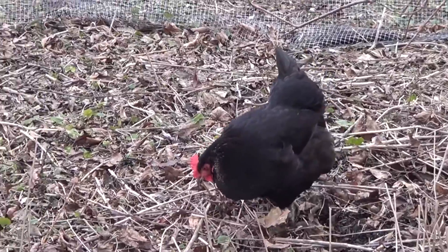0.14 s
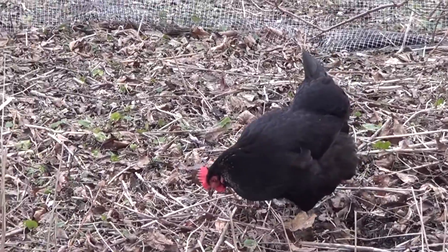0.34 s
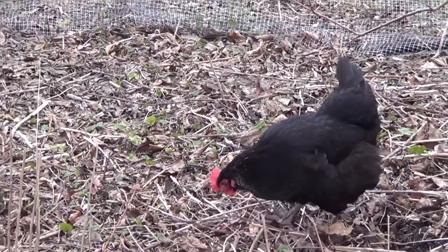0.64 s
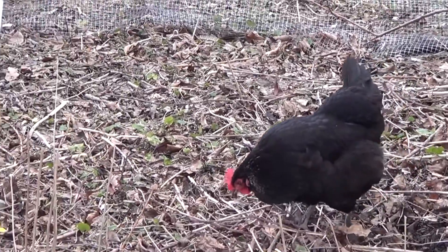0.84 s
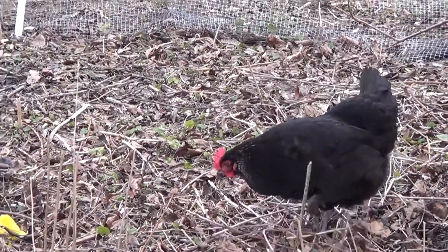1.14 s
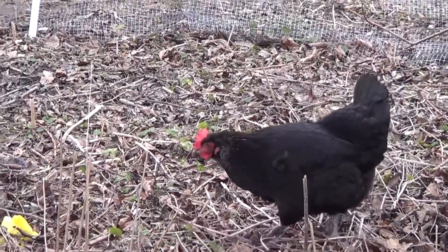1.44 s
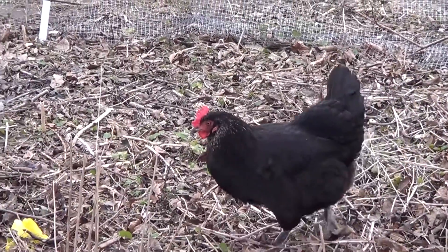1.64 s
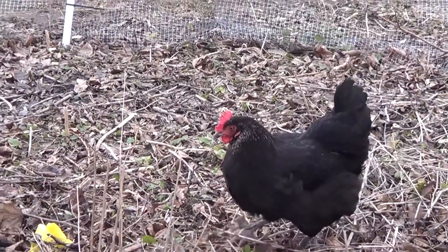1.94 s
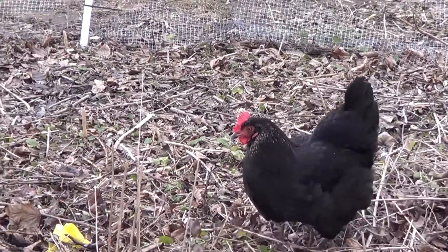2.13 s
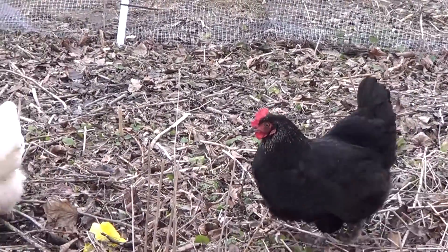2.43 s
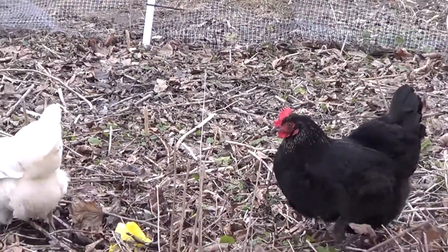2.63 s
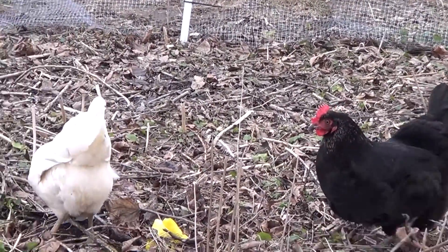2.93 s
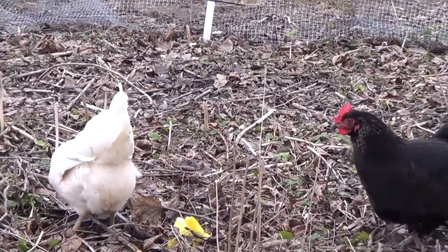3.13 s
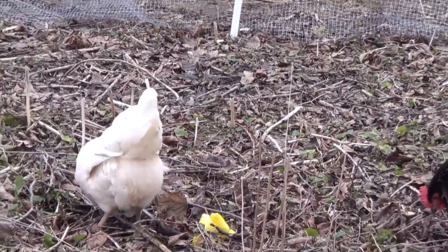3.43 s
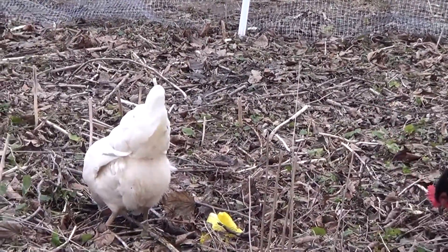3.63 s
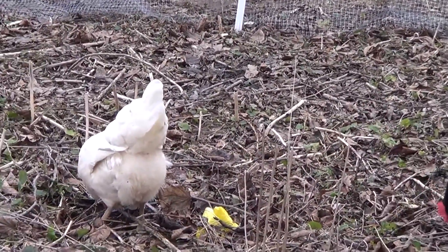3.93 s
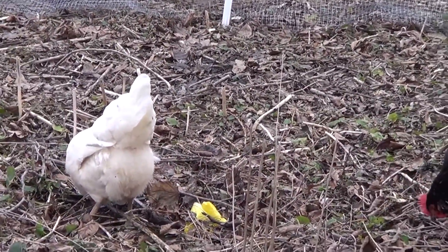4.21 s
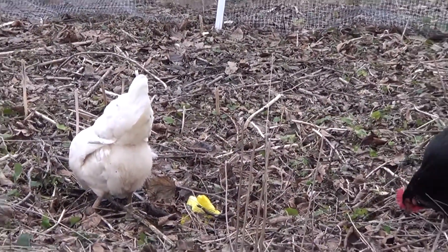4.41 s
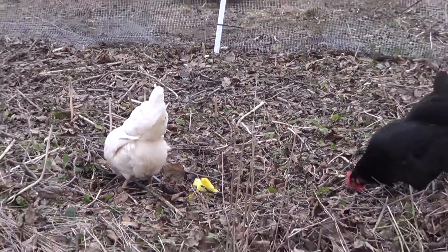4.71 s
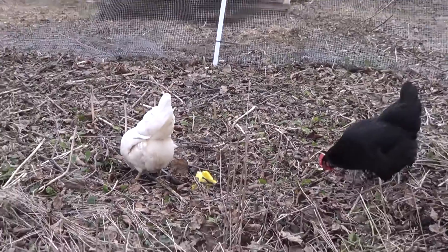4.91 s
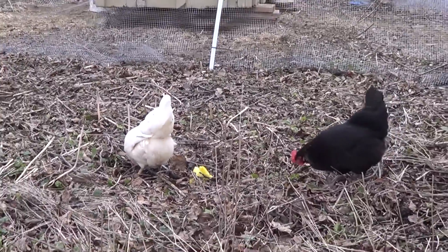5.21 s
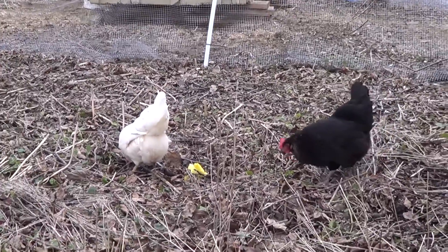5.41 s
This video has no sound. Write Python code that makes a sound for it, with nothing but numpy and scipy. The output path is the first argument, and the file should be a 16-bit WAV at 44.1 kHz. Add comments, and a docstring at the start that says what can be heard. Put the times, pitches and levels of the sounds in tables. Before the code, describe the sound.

A steady buzzing motor hum lies under bright, crisp leaf rustling. Foot scratches come in irregular swishes with dry twig snaps, densest in the middle, followed by a short lull and quieter picking. Brief hoarse bird cheeps and faint zigzag twitters appear. The handheld-style stereo microphone is a few steps away outdoors, with soft background noise and little echo.

```python
"""An outdoor run, where hens scratch and peck through dry leaves and straw while small birds chirp.
The litter is made of thousands of tiny noise bursts, with snaps and knocked stalks added one by one.
The birds are gliding whistles with a trill and a few echoes.
Behind them a motor drones as a comb of sine overtones over soft filtered noise, and a thin high tone whines."""
import sys
import numpy as np
from scipy import signal
from scipy.fft import rfft, irfft
from scipy.io import wavfile
from scipy.ndimage import uniform_filter1d

SR = 44100
rng = np.random.default_rng(int(sys.argv[2]) if len(sys.argv) > 2 else 0)


def materialize(psi):
    """Save the field psi as 16-bit PCM at rate SR to the path in sys.argv[1].

    A 1-D psi becomes a single channel; in a 2-D psi each row is a channel.
    """
    bounded = np.clip(np.atleast_2d(psi).T, -1, 1)
    quanta = np.round(bounded * 32767).astype(np.int16)
    wavfile.write(sys.argv[1], SR, quanta)


N = 245195


def amp(db):
    """Turn a level in dB into a plain multiplier."""
    return 10 ** (np.asarray(db) / 20)


def rms_one(x):
    """Scale a signal to an average strength (rms) of 1."""
    return x / np.sqrt(np.mean(x ** 2) + 1e-20)


def in_time(rows):
    """Draw straight lines between table rows, giving one value per sample for each column."""
    s, *columns = np.transpose(rows)
    return [np.interp(np.arange(N) / SR, s, column) for column in columns]


def at_hz(points, hz):
    """Read a (f/Hz, dB) table at any frequency, on a logarithmic pitch axis."""
    table_hz, table_db = np.array(points).T
    return np.interp(np.log(np.maximum(hz, 1)), np.log(table_hz), table_db)


def colour(x, spectrum):
    """Shape a sound's spectrum with a minimum-phase filter, which answers as promptly as it can."""
    wanted_db = at_hz(spectrum, np.fft.rfftfreq(4096, 1 / SR))
    cepstrum = irfft(np.log(amp(wanted_db)))
    # folding the cepstrum onto its first half makes the filter minimum-phase
    cepstrum[1:2048] *= 2
    cepstrum[2049:] = 0
    response = irfft(np.exp(rfft(cepstrum)))
    return signal.oaconvolve(x, response)[:N]


def drift(rate):
    """Random wandering around 0 with spread 1: noise smoothed twice at `rate` Hz."""
    r = np.exp(-80 * np.pi * rate / SR)   # computed at every 40th sample
    noise = rng.standard_normal(N // 40 + 2002)
    slow = signal.lfilter([1], [1, -2 * r, r * r], noise)[2000:]   # skip the filter's start
    return np.interp(np.arange(N) / 40, np.arange(len(slow)), rms_one(slow - slow.mean()))


def butter(x, hz, kind, order=2):
    """Keep the low, high or middle band of a sound with a Butterworth filter."""
    return signal.sosfilt(signal.butter(order, hz, kind, fs=SR, output="sos"), x)


FLOOR_DB, FLOOR_SWELL_DB = -43.5, 0.3   # middle level and its slow wander
# colour of the background noise: (f/Hz, relative level/dB per Hz)
FLOOR_COLOUR = [(20, -43), (70, -19.5), (200, -16), (370, -17.5), (800, -14), (1200, -21.5), (2200, -18.5),
                (2900, -26), (6000, -31.5), (9500, -48), (14000, -48), (16000, -47)]
# left-right difference compared with the shared middle: (f/Hz, level/dB)
FLOOR_WIDTH = [(30, -48), (125, -28), (400, -12.5), (1000, -9), (2000, -7), (5000, 0.5), (8000, 7),
               (10000, -31)]


def floor():
    """Outdoor air and motor noise: a shared part, plus a part added left and subtracted right."""
    mid, side = [colour(white, FLOOR_COLOUR) for white in rng.standard_normal((2, N))]
    scale = amp(FLOOR_DB + FLOOR_SWELL_DB * drift(1)) / mid.std()
    return scale * (mid + colour(side, FLOOR_WIDTH) * [[1], [-1]])


WHINE_HZ, WHINE_DB, WHINE_WIDTH_HZ = 15734, -58, 4   # the width is the spread of the pitch wander


def whine():
    """A thin high tone: one sine whose pitch wanders slightly."""
    cycles = np.cumsum(WHINE_HZ + WHINE_WIDTH_HZ * drift(30)) / SR
    return np.sqrt(2) * amp(WHINE_DB) * np.sin(2 * np.pi * cycles)


FIRST_OVERTONE, LAST_OVERTONE = 4, 55
WEAK_OVERTONE_DB, WEAK_SPREAD_DB = -66, 0.5   # every multiple not listed below
# overtones that stand out: (multiple of the turning rate, middle level/dB)
STRONG_OVERTONES = [(7, -56.5), (10, -50.5), (14, -64), (16, -63.5), (17, -53.5), (19, -58), (28, -59),
                    (30, -55), (31, -55), (32, -56), (33, -58.5), (42, -61), (47, -62), (48, -58),
                    (49, -66), (51, -63.5)]


def overtone_levels():
    """Middle level in dB of each overtone: a few stand out of a weak, uneven comb."""
    multiples = range(FIRST_OVERTONE, LAST_OVERTONE + 1)
    weak_db = WEAK_OVERTONE_DB + WEAK_SPREAD_DB * rng.standard_normal(len(multiples))
    strong_db = {round(k): db for k, db in STRONG_OVERTONES}
    return dict(zip(multiples, weak_db)) | strong_db


TURNS_PER_S, TURNS_WANDER = 30.65, 0.035   # turning rate and its wander, both in Hz
WAVER_DB, WAVER_RATE = 2.5, 4.3   # wavering of an overtone: spread in dB, speed in Hz
MOTOR_LEAD_S = 0.000083   # the drone reaches the left port first
# the two strongest overtones swell and fade: (t/s, 18th overtone level/dB, 24th overtone level/dB)
MOTOR_SWELLS = [(0.05, -40, -50), (1.24, -40.5, -46.5), (1.4, -42, -56), (2.17, -38.5, -47),
                (2.94, -38.5, -48.5), (3.25, -40, -78), (3.4, -38.5, -53), (4.32, -39.5, -46),
                (4.49, -39.5, -56), (4.68, -39, -47), (5.1, -39, -48.5), (5.18, -42, -45.5),
                (5.45, -40, -54)]
# balance of the drone: (f/Hz, left minus right level/dB)
MOTOR_BALANCE = [(200, 0), (550, -1.5), (950, -5), (1500, -8.5)]


def motor():
    """Turning parts hum at multiples of their rate: two follow a table, the others waver at random."""
    db_18, db_24 = in_time(MOTOR_SWELLS)
    turns = TURNS_PER_S + TURNS_WANDER * drift(1)
    angle = 2 * np.pi * np.cumsum(turns) / SR
    out = np.zeros((2, N))
    for k, middle_db in overtone_levels().items():
        start = rng.uniform(0, 2 * np.pi)
        wavering_db = middle_db + WAVER_DB * drift(WAVER_RATE)
        level = amp({18: db_18, 24: db_24}.get(k, wavering_db))
        hz = k * turns.mean()
        half_lead = np.pi * hz * MOTOR_LEAD_S   # as an angle
        half_db = at_hz(MOTOR_BALANCE, hz) / 2
        for side, sign in enumerate((1, -1)):   # left, right
            tone = np.sin(k * angle + start + sign * half_lead)
            out[side] += amp(sign * half_db) * level * tone
    return np.sqrt(2) * out


TRILL_HZ = 270
CHEEP_ROUGHNESS, CHIRP_ROUGHNESS, TWITTER_ROUGHNESS = 0.6, 0.75, 0.25   # depth of trill and hoarseness
HOARSE_HZ, HOARSE_RATE = 82, 86   # pitch jitter at roughness 1: spread and speed, both in Hz
EDGE_S = 0.008   # fade at both ends of a note
# All bird levels are those before trill and echoes.
# two near cheeps, each an uneven arch of points: (t/s, f/Hz, level/dB)
CHEEPS = [
    [(3.266, 2780, -39), (3.282, 2930, -43), (3.291, 3290, -32), (3.306, 3615, -25.5), (3.316, 4010, -28),
     (3.329, 3910, -30), (3.338, 4300, -44), (3.356, 3870, -26), (3.368, 3450, -41), (3.379, 3470, -26),
     (3.397, 2880, -52)],
    [(2.647, 3110, -46), (2.657, 3370, -34), (2.672, 3920, -36), (2.683, 3650, -35), (2.693, 4200, -38),
     (2.707, 4050, -43), (2.72, 3720, -38), (2.73, 3350, -25.5), (2.738, 3390, -31), (2.751, 3150, -42)],
]
# far chirps: (t/s, length/s, first f/Hz, last f/Hz, level/dB)
CHIRPS = [(0.33, 0.025, 4000, 4350, -47), (0.348, 0.059, 3290, 2745, -43), (0.553, 0.024, 4150, 4300, -48),
          (0.578, 0.05, 3240, 2830, -43), (3.822, .055, 2500, 2360, -51)]
# shape of a far zigzag twitter: (t/s from its start, f/Hz, level/dB before the offset below)
TWITTER_SHAPE = [(-.006, 4820, -51), (.024, 4420, -51), (.038, 3150, -49), (0.061, 4350, -56),
                 (.069, 3150, -46), (.091, 4200, -50), (.1, 4000, -55), (.111, 3150, -55),
                 (.121, 3680, -45), (.14, 4250, -61)]
# when the twitter is sung: (t/s, level offset/dB)
TWITTER_STARTS = [(3.681, -2), (4.14, -2)]
# outdoor echoes: (delay/s on the left, level/dB compared with the direct sound)
ECHOES = [(.009, -6), (0.018, -14), (0.033, -22)]


def birds():
    """Gliding whistles with a fast trill and a hoarse edge, followed by a few outdoor echoes."""
    t, direct = np.arange(N) / SR, np.zeros(N)
    hoarse = HOARSE_HZ * drift(HOARSE_RATE)
    notes = [(*np.transpose(arch), CHEEP_ROUGHNESS) for arch in CHEEPS]
    for s, length_s, first_hz, last_hz, db in CHIRPS:
        notes.append(([s, s + length_s], [first_hz, last_hz], [db, db], CHIRP_ROUGHNESS))
    after_s, song_hz, song_db = np.transpose(TWITTER_SHAPE)
    for s, db in TWITTER_STARTS:
        notes.append((s + after_s, song_hz, db + song_db, TWITTER_ROUGHNESS))
    for s, hz, db, rough in notes:
        on = slice(round(s[0] * SR), round(s[-1] * SR))
        glide = uniform_filter1d(np.interp(t[on], s, hz), size=160)   # rounds the corners
        pitch = glide + rough * hoarse[on]
        trill = 1 + rough * np.sin(2 * np.pi * TRILL_HZ * t[on])
        edges = signal.windows.tukey(len(pitch), min(1, 2 * EDGE_S * SR / len(pitch)))
        whistle = np.sin(2 * np.pi * np.cumsum(pitch) / SR)
        direct[on] += np.sqrt(2) * amp(np.interp(t[on], s, db)) * edges * trill * whistle

    def with_echoes(stretch):
        """Add delayed, quieter copies, with every delay stretched."""
        return direct + sum(amp(db) * np.roll(direct, round(lag * stretch * SR)) for lag, db in ECHOES)

    return np.array([with_echoes(1), with_echoes(0.92)])   # shorter delays on the right


CLUMP_DB, CLUMP_RATE = 1.27, 30   # how unevenly cracks arrive: spread in dB, speed in Hz
PATCH_DB, PATCH_RATE = 2.5, 20   # each kind of leaf swells on its own: spread in dB, speed in Hz
STRAW_TOP_HZ, CRISP_HZ = 5150, 8500   # top of the straw range; the crispest bursts lie above the second
# colour of leaves and straw: (f/Hz, relative level/dB per Hz)
LITTER_COLOUR = [(760, -30), (1300, -12.5), (1900, -7.5), (2660, -12), (3240, -4), (4220, -6), (4680, -4),
                 (7750, -2), (9360, -2), (11200, -4.5), (12600, -3), (16000, -15.5)]


def crackle(per_s, spread_db, t60_s, count, denser_db=0):
    """Clumped random cracks: each is a dying noise burst, dealt among `count` kinds of leaf."""
    sizes = amp(spread_db * np.minimum(rng.exponential(1, N), 5)) * rng.choice([-1, 1], N)
    chance = per_s * amp(denser_db + CLUMP_DB * drift(CLUMP_RATE)) / SR
    born = rng.random(N) < chance
    cracks = sizes * born * amp(-denser_db / 2)   # more cracks share the same power
    dealt = rng.integers(0, count, N)
    fade = amp(-60 * np.arange(800) / SR / t60_s)
    bursts = rng.standard_normal((2, count, len(fade))) * fade   # one set each for middle and side
    bursts[:, ::3] = butter(bursts[:, ::3], STRAW_TOP_HZ, "high")   # small leaves lack the lower range
    bursts[:, 1::4] = butter(bursts[:, 1::4], CRISP_HZ, "high")
    kinds = [cracks * (dealt == k) * amp(PATCH_DB * drift(PATCH_RATE)) for k in range(count)]
    sounds = []
    for burst_set in bursts:
        total = sum(signal.oaconvolve(kind, burst)[:N] for kind, burst in zip(kinds, burst_set))
        sounds.append(colour(total, LITTER_COLOUR))
    return sounds


SCRATCH_SWELL_DB = 20   # roughly the rise and fall over the times listed below
SCRATCH_ROUNDING = 0.066   # how blunt the loudest moment is, as a share of those times
# uneven background shuffling in the litter: (t/s, stirring level/dB)
SHUFFLE = [(0.0, -41.5), (0.12, -50), (0.5, -57), (0.53, -61), (0.56, -41.5), (0.9, -65), (1.24, -48),
           (1.66, -37.5), (1.79, -44.5), (2.0, -28.5), (2.42, -51), (2.6, -46), (3.0, -36), (3.5, -34),
           (3.575, -43), (3.9, -62), (4.39, -61), (4.7, -55), (5.37, -52.5)]
# single scratches of a foot: (loudest t/s, stirring level/dB, build-up/s, dying away/s)
SCRATCHES = [(0.2, -41.5, 0.12, 0.055), (0.381, -47, 0.028, 0.064), (0.565, -37.5, 0.038, 0.078),
             (0.7, -32, 0.12, 0.04), (0.76, -39.5, 0.061, 0.49), (0.974, -35.5, 0.016, 0.061),
             (1.085, -22.5, 0.0086, 0.038), (1.175, -36, 0.11, 0.047), (1.746, -35, 0.097, 0.045),
             (1.918, -33, 0.042, 0.074), (2.061, -18.5, 0.095, 0.12), (2.263, -24.5, 0.067, 0.055),
             (2.495, -22, 0.1, 0.4), (2.84, -16.5, 0.17, 0.17), (3.127, -24, 0.069, 0.17),
             (3.235, -23.5, 0.058, 0.042), (3.328, -21, 0.096, 0.16), (3.4, -27.5, .1, 0.062),
             (3.515, -30.5, 0.056, 0.043), (4.436, -58, 0.055, 0.11), (4.8, -39, 0.07, 0.091),
             (4.883, -39, 0.18, 0.28), (4.99, -38.5, 0.072, 0.04), (5.094, -37, 0.075, 0.042),
             (5.176, -37.5, 0.072, 0.089), (5.446, -41.5, 0.051, 0.19), (5.515, -42, 0.073, 0.097)]


def stirring():
    """How hard the litter is moved, in dB: scratches swell and die away above the shuffling."""
    t, (shuffle_db,) = np.arange(N) / SR, in_time(SHUFFLE)
    power = amp(2 * shuffle_db)
    for s, db, rise_s, fall_s in SCRATCHES:
        away = np.maximum((s - t) / rise_s, (t - s) / fall_s)
        rounded = np.hypot(away, SCRATCH_ROUNDING) - SCRATCH_ROUNDING
        power = power + amp(2 * (db - SCRATCH_SWELL_DB * rounded))
    return 10 * np.log10(power)


CRACKS_PER_S, CRACK_SPREAD_DB, CRACK_T60_S = 3200, 2.5, 0.018   # base rate; T60: time to fade by 60 dB
DENSE_SLOPE, DENSE_FROM_DB = 0.5, -36   # cracks come thicker as the stirring rises above this level
STRAW_DB, STRAW_SLOPE = -0.5, -0.42   # straw gain at -32.5 dB stirring, and its change per dB
TICKS_PER_S, TICK_SPREAD_DB, TICK_T60_S = 96, 0.5, 0.0048
TICK_DB, TICK_SLOPE = -56, 0.6   # tick level at -33.5 dB stirring, and its change per dB
LITTER_SIDE_DB, SIDE_TOP_HZ = -16, 8300   # gain and upper limit of the left-right difference


def litter():
    """Crisp leaves fill the treble; straw and lone ticks grow more slowly as the feet dig harder."""
    stir_db = stirring()
    denser_db = DENSE_SLOPE * np.maximum(stir_db - DENSE_FROM_DB, 0)
    mid, side = crackle(CRACKS_PER_S, CRACK_SPREAD_DB, CRACK_T60_S, count=12, denser_db=denser_db)
    ticks = rms_one(crackle(TICKS_PER_S, TICK_SPREAD_DB, TICK_T60_S, count=9)[0])
    straw = butter(mid, STRAW_TOP_HZ, "low", order=1)
    leaves = mid - straw
    straw_gain = amp(STRAW_DB + STRAW_SLOPE * (stir_db + 32.5))
    scattered = amp(LITTER_SIDE_DB) * butter(side, SIDE_TOP_HZ, "low", order=8)
    rustle = leaves + straw_gain * straw + scattered * [[1], [-1]]
    tick_gain = amp(TICK_DB + TICK_SLOPE * (stir_db + 33.5))
    return amp(stir_db) / mid.std() * rustle + tick_gain * ticks


KNOCK_CYCLES = 30   # the push fades by 60 dB within this many cycles of the stalk's pitch
# thicker stalks knocked by feet and beaks: (t/s, peak level/dB, f/Hz)
KNOCKS = [(1.0767, -22, 2660), (2.521, -13.5, 4030), (3.112, -24, 900), (4.6824, -21, 3620),
          (5.067, -25, 2460)]


def knocks():
    """A short noise push sets a stalk ringing around its own pitch."""
    out, t = np.zeros(N), np.arange(2000) / SR
    for s, db, hz in KNOCKS:
        push = rng.standard_normal(len(t)) * amp(-60 * t * hz / KNOCK_CYCLES)
        knock = butter(push, [hz / 1.2, hz * 1.16], "band", order=1)
        out[round(s * SR):][:len(t)] += amp(db) * knock / abs(knock).max()
    return out


SNAP_DB, SNAP_SPREAD_DB = -3.5, 1.0   # offset for all snaps; each comes from a little left or right
SNAP_RING_DB, SNAP_WIDTH = 4.5, 0.1   # ring against broad crack; half-width as a share of the pitch
SNAP_T60_S, SETTLE_T60_S, SETTLE_DB = 0.007, 0.053, -15   # crack, then the quieter settling
FIRST_CLICK = 2.5   # the first sample before fading, in units of the noise spread
# single snaps and pecks: (t/s, peak level/dB before offset and left-right spread, brightest f/Hz)
SNAPS = [(0.1328, -22, 9100), (0.2487, -20, 6660), (0.372, -14.5, 11300), (0.5457, -21, 12200),
         (0.624, -18.5, 9330), (0.689, -12, 9100), (0.708, -11, 9310), (0.72, -16.5, 9460),
         (0.7518, -15, 9530), (0.786, -12.5, 9400), (0.91, -17.5, 9000), (0.9287, -19, 12100),
         (1.0768, -3, 10000), (1.1873, -13.5, 12000), (1.27, -22, 8800), (1.662, -16, 9530),
         (1.851, -11, 9900), (1.8694, -19, 12100), (2.017, -5.5, 10700), (2.237, -10.5, 8500),
         (2.2665, -11, 9130), (2.321, -14, 9080), (2.352, -18, 9510), (2.357, -21, 9500),
         (2.3781, -10, 9600), (2.442, -17, 9830), (2.643, -11.5, 6200), (2.888, -10, 9400),
         (3.142, -14, 11500), (3.238, -6, 10400), (3.424, -16, 9500), (3.485, -12, 10100),
         (3.5505, -12, 9050), (4.152, -31, 8570), (4.449, -22, 9700), (4.5391, -28, 11400),
         (4.6355, -18, 8150), (4.6824, -13, 7300), (4.749, -16, 11200), (5.0676, -19, 10300),
         (5.0969, -26, 9660), (5.1502, -18.5, 8930), (5.1748, -13, 9090), (5.2138, -16.5, 5860),
         (5.315, -20.5, 6560)]


def snaps():
    """A sudden broad crack that rings around its own pitch, then a rustle as the leaves settle."""
    out, t = np.zeros((2, N + 6000)), np.arange(6000) / SR   # room for the last tail
    litter_pulse = colour(np.eye(1, 256)[0], LITTER_COLOUR)[:512]   # one click in the litter's colour
    fade = amp(-60 * t / SNAP_T60_S) + amp(SETTLE_DB - 60 * t / SETTLE_T60_S)
    for s, db, hz in SNAPS:
        noise = rng.standard_normal(len(t))
        noise[0] = FIRST_CLICK
        burst = noise * fade
        broad = np.convolve(burst, litter_pulse)[:len(t)]
        band = [hz / (1 + SNAP_WIDTH), min(hz * (1 + SNAP_WIDTH), 0.45 * SR)]
        ring = butter(burst, band, "band", order=1)
        crack = broad / abs(broad).max() + amp(SNAP_RING_DB) * ring / abs(ring).max()
        pan_db = SNAP_SPREAD_DB * rng.standard_normal() * np.array([1, -1])
        gain = amp(db + SNAP_DB + pan_db)[:, None]
        out[:, round(s * SR):][:, :len(t)] += gain * crack / abs(crack).max()
    return out[:, :N]


def scene():
    """All sources together at the two microphone ports."""
    return floor() + whine() + motor() + birds() + litter() + knocks() + snaps()


PORT_HZ, PORT_WIDTH_HZ, PORT_DB = 9450, 870, -2.5   # resonance: pitch, width, level of the added ring
CUTOFF_HZ = 15800


def record(dry):
    """The microphone ports resonate in the treble; a steep filter cuts the very top."""
    port = signal.lfilter(*signal.iirpeak(PORT_HZ, PORT_HZ / PORT_WIDTH_HZ, fs=SR), dry)
    cut = signal.ellip(12, 0.5, 80, CUTOFF_HZ, fs=SR, output="sos")   # 0.5 dB ripple, 80 dB cut
    return signal.sosfilt(cut, dry + amp(PORT_DB) * port)


dry = scene()
out = record(dry)
materialize(out)
```